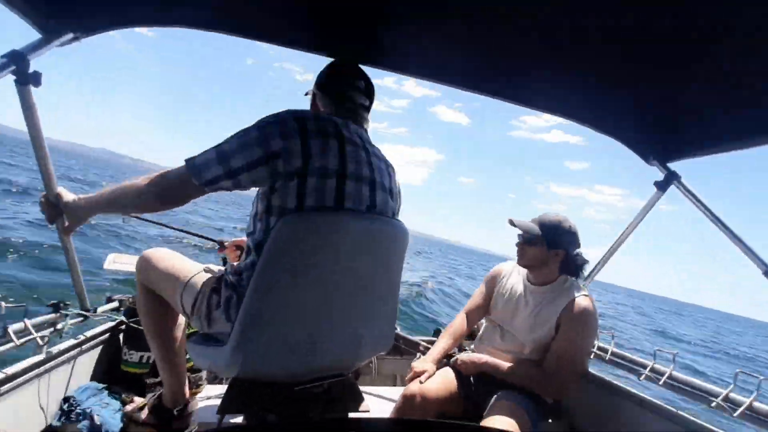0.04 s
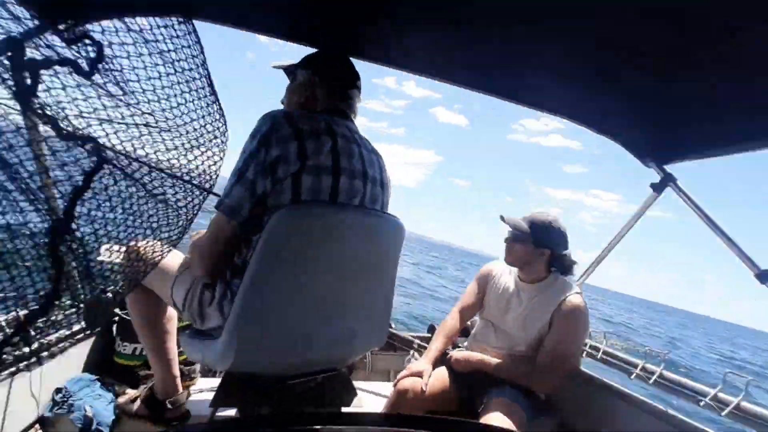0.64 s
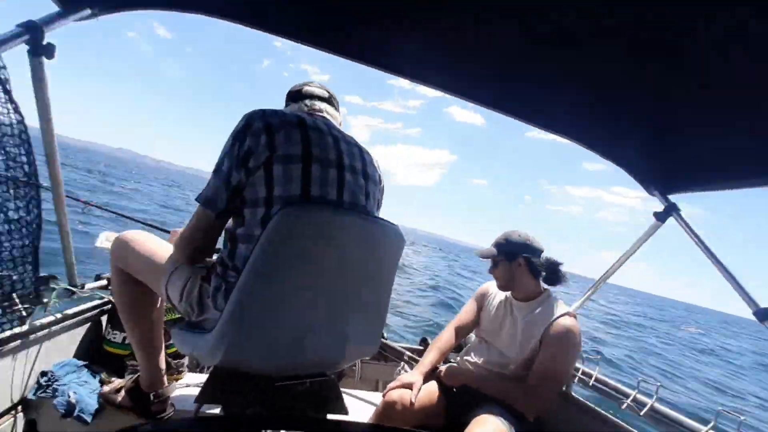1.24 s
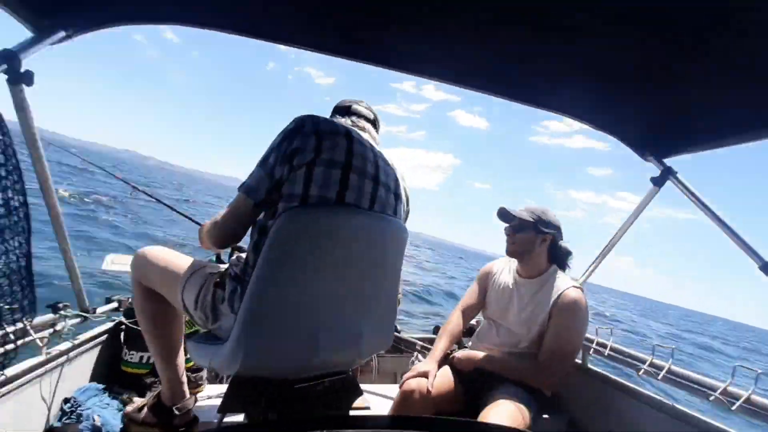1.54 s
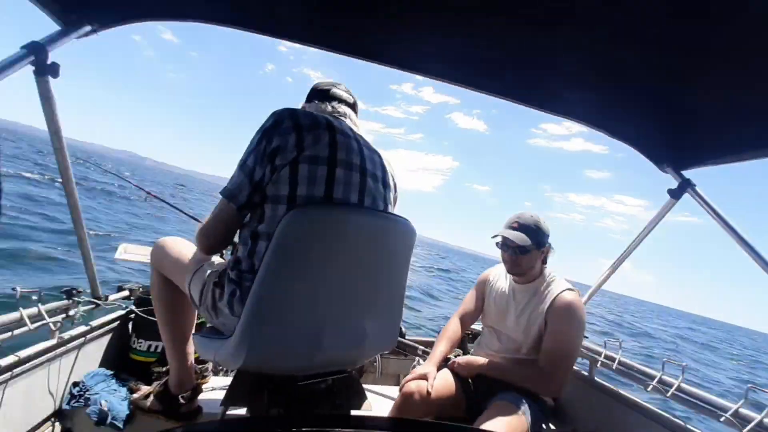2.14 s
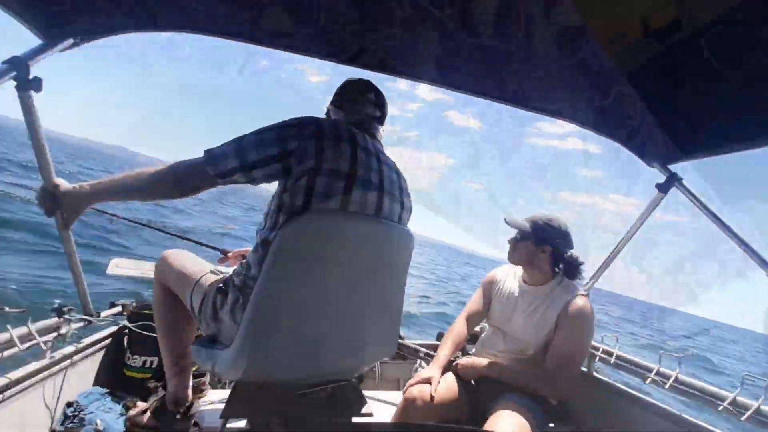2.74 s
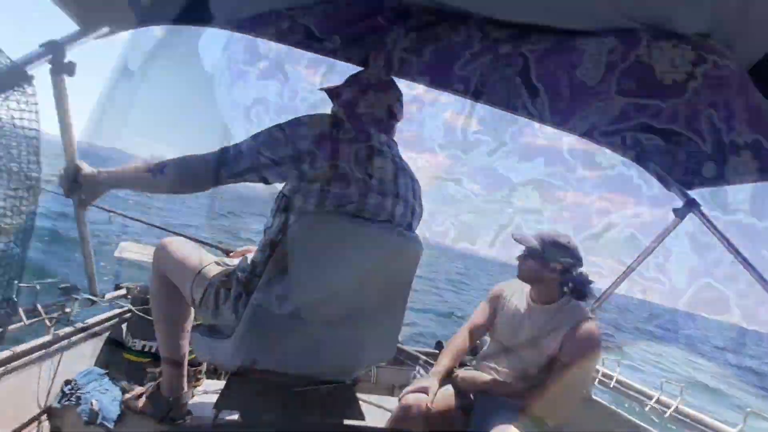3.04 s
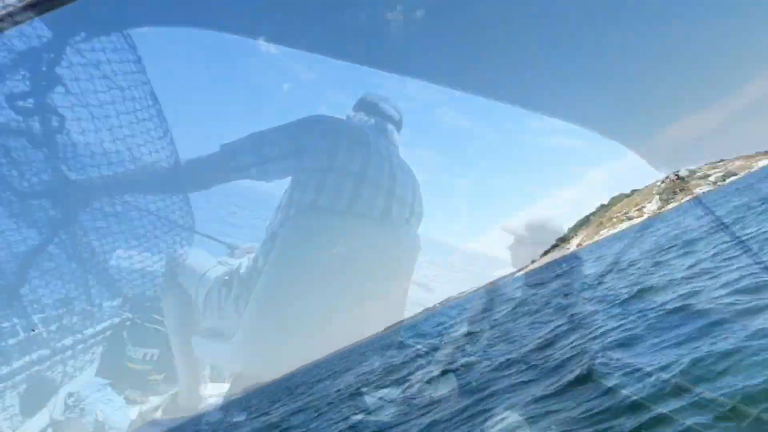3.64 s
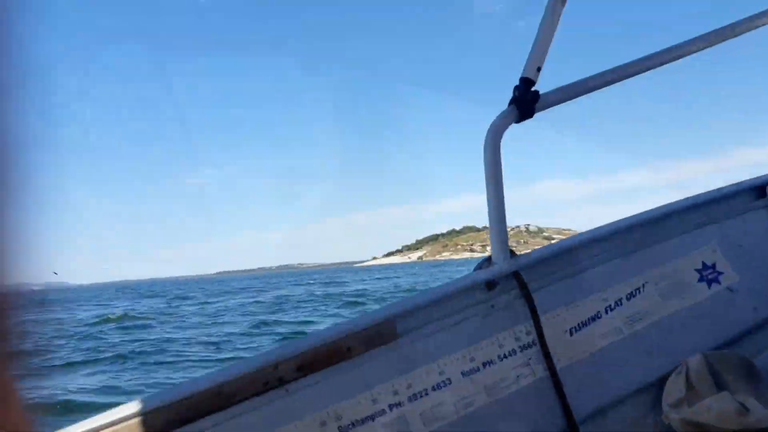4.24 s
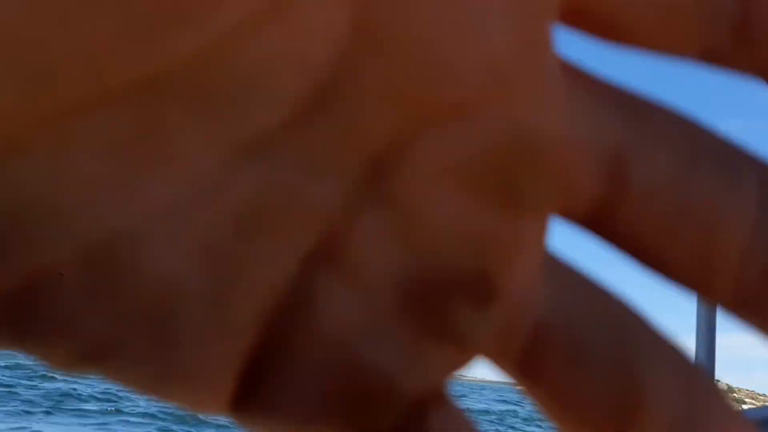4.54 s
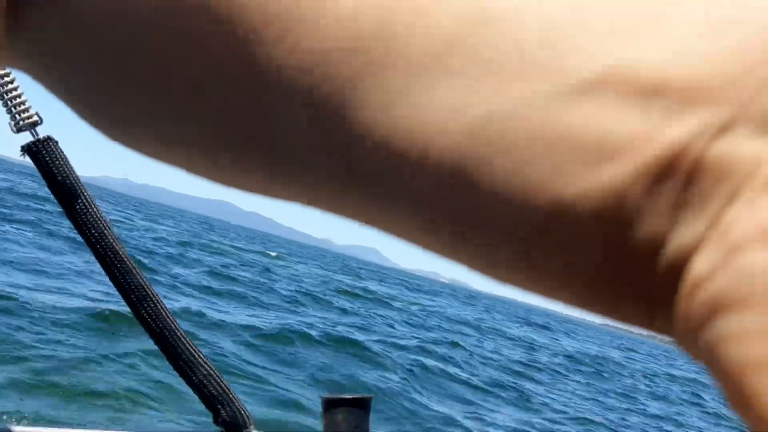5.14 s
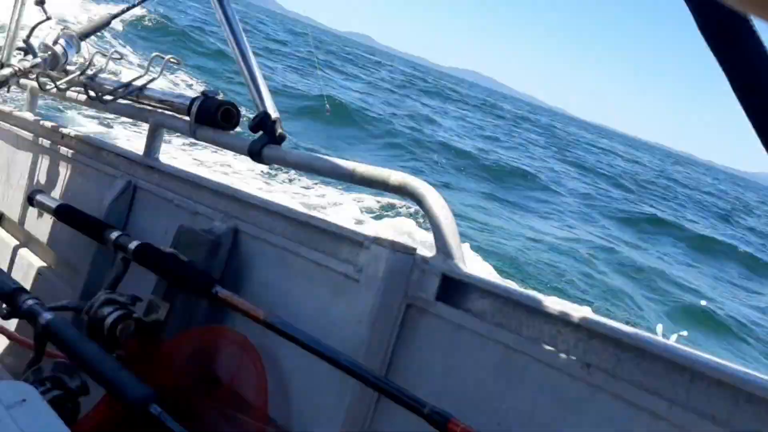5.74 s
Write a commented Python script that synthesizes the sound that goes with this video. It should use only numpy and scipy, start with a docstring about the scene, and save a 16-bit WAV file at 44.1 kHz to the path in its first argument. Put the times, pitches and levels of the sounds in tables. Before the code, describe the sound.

For the first 1.7 seconds, small waves lap quietly against a drifting aluminium boat, with low sloshing, light splashes, bubbles and hollow plops. A very faint squeak comes near the start. At about 1.75 seconds the lapping cuts out and the boat at speed fades in, growing much louder until about 4.5 seconds. An outboard motor holds a steady, low drone that booms in the open hull. Water rushes and spray hisses along the side, surging with each wave, while wind rumbles on the microphone. Low gusts thud irregularly, strongest from 3 seconds on. Chop smacks the bottom in a cluster from 3.4 to 3.7 seconds, more lightly near 4.5, and again around 5.4 to 5.7. Loose panels rattle briefly near 3.5 and 4.3 seconds. The motor and wash are loudest near the end, just before 6 seconds.

```python
"""Small waves lap at a drifting aluminium boat: slosh, bubbles, plops of drips and trapped air, a faint squeak.
Then the boat fades in under way. Wind buffets the two microphone ports, water rushes and sprays along the side,
chop slaps the bottom and loose panels rattle. The outboard holds its cruising speed: its firings make a stack
of exhaust tones, shake the cowling and boom in the open hull."""
import sys
import numpy as np
from scipy import signal
from scipy.fft import rfft, irfft, next_fast_len
from scipy.io import wavfile
from scipy.ndimage import uniform_filter1d

SR = 44100
rng = np.random.default_rng(int(sys.argv[2]) if len(sys.argv) > 2 else 0)


def materialize(psi):
    """Save the field psi as 16-bit PCM at rate SR to the path in sys.argv[1].

    A 1-D psi becomes a single channel; in a 2-D psi each row is a channel.
    """
    bounded = np.clip(np.atleast_2d(psi).T, -1, 1)
    quanta = np.round(bounded * 32767).astype(np.int16)
    wavfile.write(sys.argv[1], SR, quanta)


N = 259749
TIME = np.arange(N) / SR
UNDER_WAY_S = 1.749  # the drifting boat gives way to the boat at speed


def gain_of(db):
    """Decibels to amplitude."""
    return 10 ** (np.asarray(db) / 20)

def unit_rms(x):
    """Scales to rms 1."""
    return x / np.sqrt(np.mean(x ** 2) + 1e-20)

def curve(rows, column=1):
    """An automation lane: one table column, joined by straight lines in time."""
    rows = np.asarray(rows)
    return np.interp(TIME, rows[:, 0], rows[:, column])

def humps(rows):
    """Smooth passing lifts in level, in dB."""
    return sum(db * np.exp(-((TIME - s) / half) ** 2) for s, half, db in rows)

def swell(t, length):
    """An envelope that rises to 1 in half the length, then dies away."""
    age = 2 * np.maximum(t, 0) / length
    return (age * np.exp(1 - age)) ** 2

def wander(rate_hz):
    """Slow random modulation at rms 1."""
    control_hz = 500
    hz = np.fft.rfftfreq(4096, 1 / control_hz)
    slow = irfft(rfft(rng.standard_normal(4096)) / (1 + (hz / rate_hz) ** 4))
    return unit_rms(np.interp(TIME * control_hz, np.arange(len(slow)), slow))

def add(mix, s, sound):
    """Mixes a stereo sound in at time s."""
    part = mix[:, max(round(s * SR), 0):][:, :sound.shape[1]]
    part += sound[:, :part.shape[1]]

def noise():
    """Two unrelated white noises."""
    return rng.standard_normal((2, N))

def stereo(pair, same, left_db):
    """Blends two unrelated signals into a left and right of given likeness and balance."""
    mid, side = np.sqrt((1 + same) / 2) * pair[0], np.sqrt((1 - same) / 2) * pair[1]
    return np.array([(mid + side) * gain_of(left_db / 2), (mid - side) * gain_of(-left_db / 2)])

def equalise(x, eq):
    """Shapes x with an EQ curve, at rms 1."""
    size = next_fast_len(N, True)
    hz, db = np.transpose(eq)
    gain = gain_of(np.interp(np.log(np.fft.rfftfreq(size, 1 / SR) + 1), np.log(hz), db))
    return unit_rms(irfft(rfft(x, size) * gain, size)[..., :N])

def ring(x, hz, width_hz):
    """A band-pass resonance, at rms 1."""
    return unit_rms(signal.lfilter(*signal.iirpeak(hz, hz / width_hz, fs=SR), x))

def churn(patchy_db, drops_per_s, drop_share, spread_db):
    """Water texture: a noise bed and drops of uneven size, patchy in time and pitch."""
    sizes = gain_of(spread_db * np.minimum(rng.exponential(1, N), 4))
    drops = unit_rms(noise() * sizes * (rng.random(N) < drops_per_s / SR))
    spectra = signal.stft(noise() + drop_share * drops, nperseg=512)[2]
    patches = uniform_filter1d(rng.standard_normal(spectra.shape[1:]), size=6, axis=0)
    patches = unit_rms(uniform_filter1d(patches, size=7, axis=1))
    return signal.istft(spectra * gain_of(patchy_db * patches), nperseg=512)[1][:, :N]

def hits(rows, width, same, top):
    """Noise puffs swell and die in a resonance; width and top (low-pass) are multiples of its pitch."""
    out, t = np.zeros((2, N)), TIME[:SR // 3]
    for s, db, hz, length in rows:
        puff = ring(stereo(rng.standard_normal((2, len(t))), same, 0), hz, width * hz)
        puff = signal.sosfilt(signal.butter(2, top * hz, fs=SR, output="sos"), puff)
        add(out, s, gain_of(db) * unit_rms(puff * swell(t, length)) * np.sqrt(length * SR / len(t)))
    return out


# Squeak cues: t/s, length/s, level/dB
SQUEAK_CUES = [(.18, .06, -76), (.255, .05, -75), (.365, .045, -79)]
def squeaks(pitch_hz=4900):
    """A piece of boat hardware rubs: a faint, unsteady whistle."""
    out = np.zeros(N)
    for s, length, db in SQUEAK_CUES:
        rub = np.sin(np.pi * np.clip((TIME - s) / length, 0, 1))
        level = gain_of(db + 2.4 * wander(90))
        out += level * rub * np.sin(2 * np.pi * np.cumsum(pitch_hz + 15 * wander(90)) / SR)
    return out

def bubbles(count=240, level_db=-5.5, spread_db=13, low_hz=520, high_hz=3000, cycles=6):
    """Small bubbles ring for a few cycles, rising in pitch as they near the surface."""
    out, t = np.zeros((2, N)), TIME[:SR // 20]
    for when, pitch, size, pan in rng.random((count, 4)):
        hz = low_hz * (high_hz / low_hz) ** pitch
        age = t * hz / cycles
        blip = np.sin(2 * np.pi * hz * t * (1 + 0.0098 * age)) * np.exp(-age) * (1 - np.exp(-10 * age))
        blip *= gain_of(level_db + spread_db * size ** 2) * (low_hz / hz) ** 0.74
        add(out, when * UNDER_WAY_S, np.sqrt([[pan], [1 - pan]]) * blip)
    return out

# EQ of the dark slosh and the bright splash: f/Hz, level/dB
SLOSH_EQ = [(25, -20), (55, 5), (130, 1.5), (230, -2.5), (370, 3.5), (620, -6), (1000, -14.5),
            (2100, -26.5), (3500, -29), (7000, -42)]
SPLASH_EQ = [(400, 6), (900, 4.5), (1500, 4.5), (2200, 0), (3000, -4.5), (5200, -6), (7200, -20),
             (8600, -39), (12000, -14), (16000, -31)]
# Swells rock the hull and stir the slosh: crest t/s, half length/s, lift/dB
ROCKING = [(.02, .03, 9.5), (.24, 0.12, 2.5), (.885, 0.045, 7), (1.11, 0.066, 4.5), (1.47, 0.073, 7)]
# Wavelets break on the side: t/s, level/dB, length/s
WAVELETS = [(0.009, -60.5, 0.054), (0.107, -55.5, 0.043), (0.301, -63.5, 0.049), (0.542, -65, .03),
            (0.685, -76, 0.014), (0.747, -66.5, .014), (0.94, -67, 0.058), (0.986, -58.5, 0.011),
            (1.165, -66, 0.041), (1.389, -63, 0.047), (1.568, -65.5, 0.044)]
def lapping(slosh_db=-57, ripple_db=-78.5, settle_db_per_s=-5.5):
    """Water sloshes under the drifting hull and splashes at its side, slowly settling."""
    slosh = churn(patchy_db=2.5, drops_per_s=270, drop_share=0.63, spread_db=0)
    slosh = equalise(stereo(slosh, same=0.036, left_db=0.5), SLOSH_EQ)
    splash = churn(patchy_db=0.5, drops_per_s=530, drop_share=0.6, spread_db=2)
    splash = equalise(stereo(splash, same=0.085, left_db=-0.5), SPLASH_EQ)
    stirred_db = settle_db_per_s * TIME + humps(ROCKING)
    ripples = gain_of(ripple_db + 0.64 * stirred_db)  # small far waves partly follow the slosh
    breaking = sum(gain_of(db) * swell(TIME - s, length) for s, db, length in WAVELETS)
    return (slosh + bubbles()) * gain_of(slosh_db + stirred_db) + splash * (ripples + breaking)

# Plop cues: t/s, level/dB, f/Hz, length/s
PLOP_CUES = [(.13, -58, 1500, 0.018), (.434, -66, 589, 0.0042), (.595, -65, 616, 0.0044),
             (.689, -66, 490, .005), (.744, -63, 476, .006), (.801, -62, 510, .005),
             (.878, -57, 103, 0.028), (.964, -65, 655, 0.0078), (.97, -63.5, 660, 0.066),
             (1.066, -62, 640, 0.028), (1.068, -61, 840, .027), (1.1, -64, 1240, 0.021),
             (1.455, -66, 770, 0.018), (1.573, -62, 533, 0.0071)]
def plops():
    """Drips fall and trapped air gurgles under the hull, each plop with a hollow pitch."""
    return hits(PLOP_CUES, width=0.019, same=0.43, top=2.4)

# EQ of the wind bed: f/Hz, level/dB
WIND_EQ = [(25, 0), (40, -13), (55, -3.5), (72, 6), (110, 18), (170, -8), (260, -4), (400, -28), (800, -55)]
def wind(level_db=-26, lumpy_db=-2.5):
    """Head wind: lumpy low turbulence, mostly unrelated at the two ports."""
    eddies = stereo(noise(), same=0.15, left_db=-1.5)
    return equalise(eddies * gain_of(lumpy_db * wander(25)), WIND_EQ) * gain_of(level_db)

# Gust cues: t/s, level/dB, f/Hz, length/s
GUST_CUES = [(2.19, -34, 66.4, 0.054), (2.35, -30.5, 56, 0.097), (2.7, -32, 56, 0.13),
             (3.04, -17, 62, 0.023), (3.11, -23, 56.4, 0.066), (3.4, -21, 113, 0.047),
             (3.68, -14.5, 117, 0.038), (4.44, -25, 97, 0.028), (4.71, -14, 80, 0.034),
             (4.905, -16, 84, 0.014), (5.3, -21.5, 110, 0.077), (5.42, -23, 99, 0.037),
             (5.585, -13, 101, 0.018)]
def gusts():
    """Gusts hit the ports with low thuds."""
    return hits(GUST_CUES, width=0.27, same=0.3, top=4.1)

# EQ of the hull rumble and the bow wash: f/Hz, level/dB
RUMBLE_EQ = [(60, -11.5), (130, 1), (220, 6.5), (320, 2.5), (450, -5.5), (600, -10), (850, -15.5),
             (1500, -89), (3000, -64)]
WASH_EQ = [(250, 6), (600, 2), (900, 5), (1250, 2), (2100, 0.5), (2700, -11.5), (4000, -47), (7000, -36),
           (8500, -38)]
# The bow runs into waves: crest t/s, half length/s, surge/dB
BOW_WAVES = [(2.15, 0.54, 4), (2.87, 0.35, 5), (3.65, 0.16, 7), (4.49, 0.18, 5.5), (5.1, 0.077, 1.5),
             (5.68, 0.15, 7)]
def hull_water(firings, rumble_db=-27, wash_db=-35.5, throb=0.15):
    """The hull rumbles over the chop and the bow wash churns; both surge with each wave."""
    rumble = churn(patchy_db=3, drops_per_s=150, drop_share=0.13, spread_db=-0.5)
    rumble = equalise(stereo(rumble, same=0.74, left_db=-2.5), RUMBLE_EQ)
    wash = churn(patchy_db=1, drops_per_s=540, drop_share=0.4, spread_db=2.5)
    wash = equalise(stereo(wash, same=-0.066, left_db=-4), WASH_EQ)
    surge_db = humps(BOW_WAVES)
    wake_db = 0.76 * (TIME - UNDER_WAY_S)  # the microphone turns toward the wake
    rumble *= gain_of(rumble_db + 0.45 * surge_db + wake_db)
    wash *= gain_of(wash_db + surge_db)
    shaken = 1 + throb * np.cos(2 * np.pi * firings)  # the engine shakes the wetted hull
    return (rumble + wash) * shaken

# Panning as the microphone swings: t/s, engine left-right/dB, engine left lag/s, spray left-right/dB
PANNING = [(2, -4, .0001, 1.5), (2.7, -1.5, .0004, 1), (3.6, -1, .0004, -1.5), (4.5, 2.5, .0004, -3.5),
           (5.2, 8, -.0001, -3.5), (5.7, -0.5, -.0001, -2.5)]
# EQ of the spray: f/Hz, level/dB
SPRAY_EQ = [(800, -12.5), (2200, 4), (3200, 4), (4500, -2.5), (6700, -3.5), (7500, -10.5), (8500, -29),
            (10000, -24.5), (16000, -34)]
def spray(level_db=-46.5):
    """Thrown drops hiss along the side, surging with each wave."""
    drops = churn(patchy_db=2.37, drops_per_s=2500, drop_share=0.98, spread_db=-1.5)
    hiss = equalise(stereo(drops, same=0, left_db=curve(PANNING, column=3)), SPRAY_EQ)
    wake_db = 1.5 * (TIME - UNDER_WAY_S)  # the microphone turns toward the wake
    return hiss * gain_of(level_db + 0.78 * humps(BOW_WAVES) + wake_db)

# EQ of the mist: f/Hz, level/dB
MIST_EQ = [(3000, 7), (6500, 6), (7500, 3), (8500, -13.5), (9800, -7.5), (11500, -2), (15800, -3)]
# Passing sheets of mist: middle t/s, half length/s, lift/dB
MIST_SHEETS = [(1.9, 0.23, 7.5), (2.85, 0.095, 3), (3.63, .08, 5.5), (4.06, 0.28, 9.5), (4.66, 0.21, 6.5),
               (5.08, 0.2, 10.5), (5.7, 0.12, 6)]
def mist(level_db=-46.5):
    """Fine mist blows past in sheets of airy hiss."""
    hiss = equalise(stereo(noise(), same=0, left_db=curve(PANNING, column=3)), MIST_EQ)
    return hiss * gain_of(level_db + 0.5 * wander(30) + humps(MIST_SHEETS))

# Slap cues: t/s, level/dB, f/Hz, length/s
SLAP_CUES = [(2.79, -34, 484, 0.011), (3.393, -20.5, 410, 0.015), (3.411, -21, 348, 0.0072),
             (3.595, -26.5, 750, 0.017), (3.702, -14.5, 510, .006), (3.721, -18, 560, 0.0051),
             (4.4, -35, 384, 0.037), (4.45, -29.5, 940, 0.012), (4.52, -30, 600, 0.016),
             (5.43, -19.5, 384, 0.024), (5.63, -27, 3080, 0.0036), (5.68, -24.5, 700, 0.041)]
def slaps():
    """Chop strikes the bottom with short, heavily damped smacks."""
    return hits(SLAP_CUES, width=1.5, same=0.062, top=1.24)

# Rattle cues: t/s, level/dB, f/Hz, length/s
RATTLE_CUES = [(3.43, -39.5, 1526, 0.068), (3.435, -39.5, 2020, 0.056), (3.58, -36, 1510, 0.031),
               (4.285, -36.5, 2010, 0.033), (4.29, -43, 1480, .035)]
def rattles():
    """Loose panels break into a ringing rattle."""
    return hits(RATTLE_CUES, width=0.04, same=0.2, top=2)

# Engine firing rate: t/s, f/Hz
FIRING_RATE = [(2.15, 55.4), (2.5, 55.75), (3.8, 55.92), (4.2, 55.85), (4.7, 56.3), (5.1, 55.86),
               (5.4, 55.76), (5.75, 56.02)]
def firing_count(jitter=0.00086):
    """Running count of firings at a slightly unsteady cruising speed."""
    return np.cumsum(curve(FIRING_RATE) * (1 + jitter * wander(6.85))) / SR

# Engine faders for the moving listener: t/s, exhaust level/dB, cowling level/dB
ENGINE_FADERS = [(1.9, -23, -17), (2.7, -20, -11.5), (3.4, -21.5, -19.5), (5, -22.5, -23),
                 (5.6, -16.5, -17), (5.89, -21, -17.5)]
# Cowling and hull panel resonances: f/Hz, width/Hz, relative level/dB
PANEL_MODES = [(1558, 99, -22), (2014, 127, -24.5)]
def clatter(firings, decay_cycles=0.42, steady=0.49, trim_db=-5):
    """Every firing shakes the cowling and hull panels."""
    shake = stereo(noise(), same=0.11, left_db=3.5) * (steady + np.exp(-(firings % 1) / decay_cycles))
    panels = sum(gain_of(db) * ring(ring(shake, hz, 2 * width), hz, 2 * width)
                 for hz, width, db in PANEL_MODES)
    return panels * gain_of(curve(ENGINE_FADERS, column=2) + trim_db)

def sway(depth_db=4.5, crest_s=4.235, period_s=0.339, middle_s=4.32, half_s=0.55):
    """Swaying through the hull's standing waves briefly trades one booming note for the other, in dB."""
    swing = np.cos(2 * np.pi * (TIME - crest_s) / period_s)
    return depth_db * swing * np.exp(-((TIME - middle_s) / half_s) ** 4)

# Exhaust tones and the cowling's whirr: f/firing rate
EXHAUST_ORDERS = (1, 2, 4, 6, 7, 8, 9, 10, 11, 12, 14, 15)
WHIRR_ORDERS = (17, 19, 21, 23, 24, 27, 28, 29, 36)
# Trim of each exhaust tone: level/dB
EXHAUST_TRIMS = [-11.5, -9, -10, -26.5, -20, -22, -16.5, -17, -22, -25, -24, -31]
# Standing waves boom in the hull, by listening place: t/s, third order level/dB, fifth order level/dB
HULL_BOOM = [(1.75, -25, -33), (1.95, -25.5, -24.5), (2.2, -26.5, -26.5), (2.48, -23.5, -31.5),
             (2.68, -32, -24.5), (2.84, -23.5, -20), (3.15, -27.5, -23.5), (3.66, -19.5, -25.5),
             (3.96, -28.5, -22.5), (4.3, -24.5, -25), (5.05, -29, -25.5), (5.6, -16, -17),
             (5.89, -16.5, -23.5)]
def outboard(firings, whirr_db=-36, waver_db=2.5, boom_waver_db=0.8, smear=0.14, port_spread=0.28):
    """Multiples of the firing rate waver as the boat pitches, and reach the ports a little apart."""
    exhaust_db, cowling_db = curve(ENGINE_FADERS), curve(ENGINE_FADERS, column=2)
    booming = (3, curve(HULL_BOOM) + sway()), (5, curve(HULL_BOOM, column=2) - sway())
    tones = [(order, exhaust_db + db + waver_db * wander(4.2))
             for order, db in zip(EXHAUST_ORDERS, EXHAUST_TRIMS)]
    tones += [(order, db + boom_waver_db * wander(4)) for order, db in booming]
    tones += [(order, cowling_db + whirr_db + waver_db * wander(9.3)) for order in WHIRR_ORDERS]
    sides = np.array([[0.5], [-0.5]])
    arriving = firings - sides * curve(PANNING, column=2) * curve(FIRING_RATE)
    out = np.zeros((2, N))
    for order, db in tones:
        # shifting reflections smear the phase
        drift = np.sqrt(order) * (smear * wander(8.6) + sides * port_spread * wander(1))
        out += np.sqrt(2) * gain_of(db) * np.cos(2 * np.pi * (order * arriving + rng.random()) + drift)
    return out * gain_of(sides * curve(PANNING))

def scene(cut_s=0.0035, fade_s=2.81):
    """The drifting boat cuts out and the boat at speed fades in; slaps, gusts and rattles skip the fade."""
    firings = firing_count()
    running = outboard(firings) + clatter(firings) + hull_water(firings) + spray() + mist() + wind()
    accents = slaps() + gusts() + rattles()
    drifting = lapping() + plops() + squeaks()
    under_way = np.clip((TIME - UNDER_WAY_S) / cut_s, 0, 1)
    fade = np.clip((TIME - UNDER_WAY_S) / fade_s, 0.015, 1) ** 0.82
    return (1 - under_way) * drifting + under_way * fade * running + accents

def record(dry, low_cut_hz=36, high_cut_hz=15850):
    """The microphone's bass cut and a steep band limit."""
    thinned = signal.sosfilt(signal.butter(4, low_cut_hz, "high", fs=SR, output="sos"), dry)
    band_limit = signal.firwin(511, high_cut_hz, window=("kaiser", 9), fs=SR)
    return signal.oaconvolve(thinned, band_limit[None], "same")


dry = scene()
out = record(dry)
materialize(out)
```